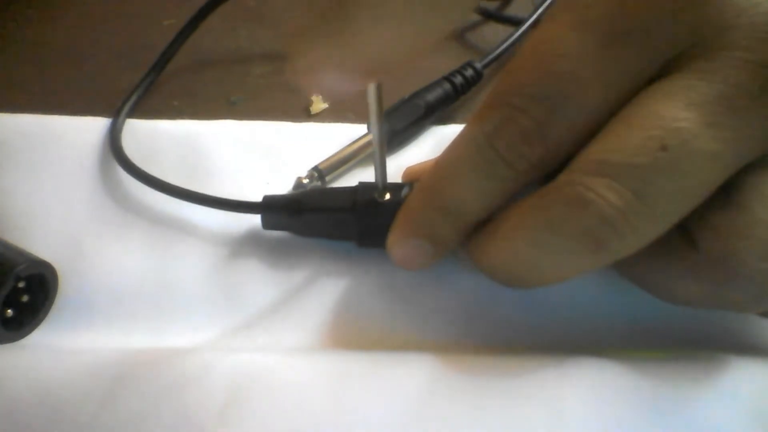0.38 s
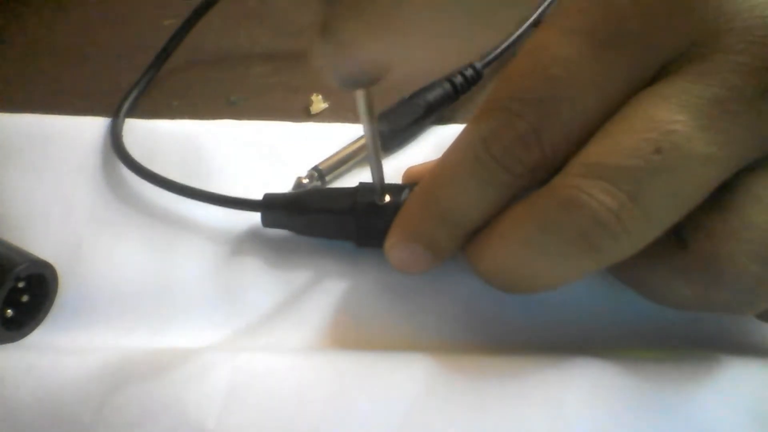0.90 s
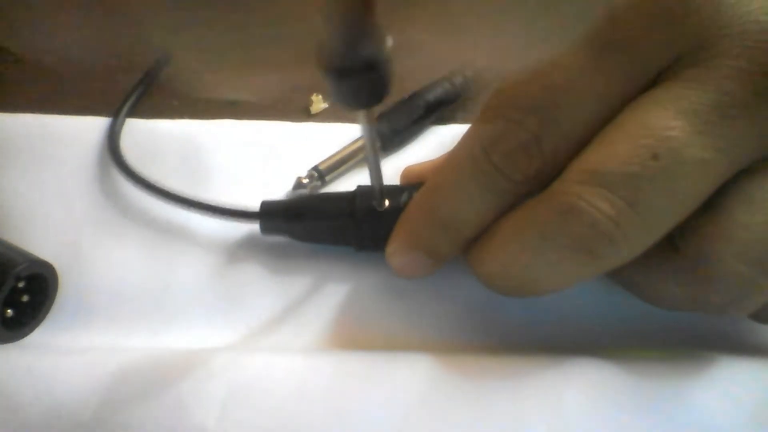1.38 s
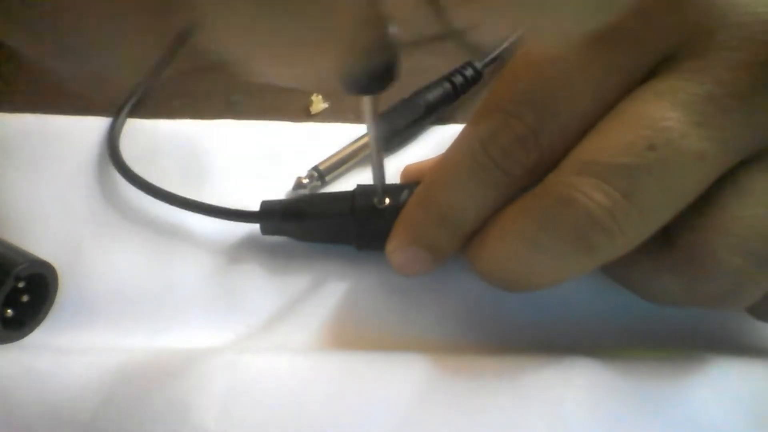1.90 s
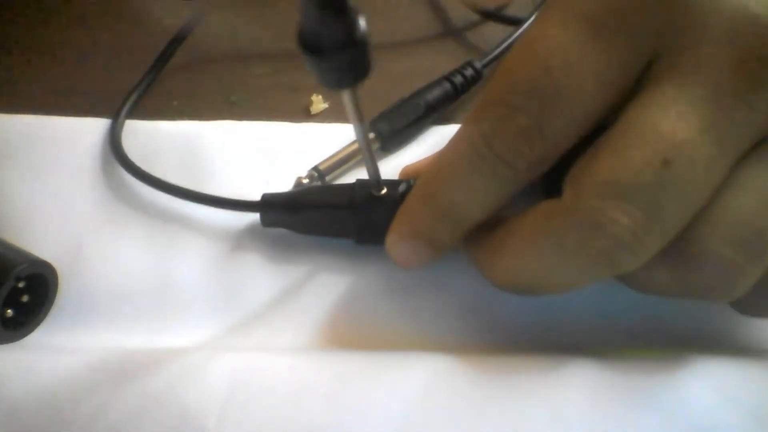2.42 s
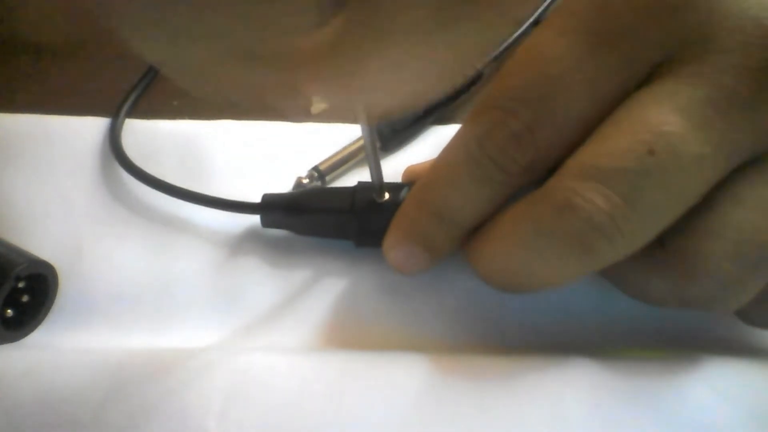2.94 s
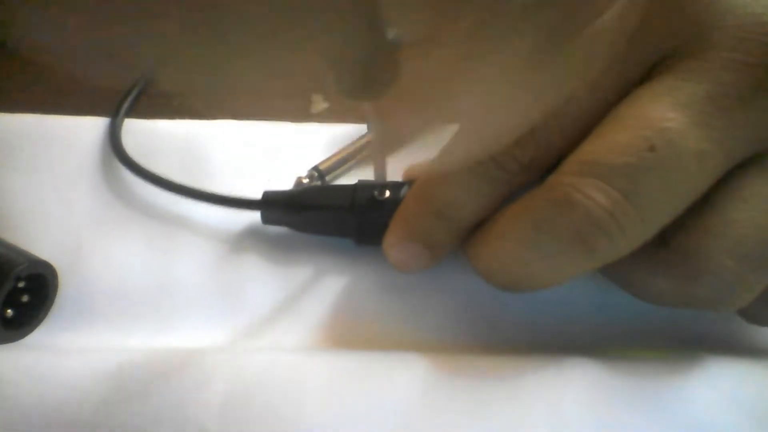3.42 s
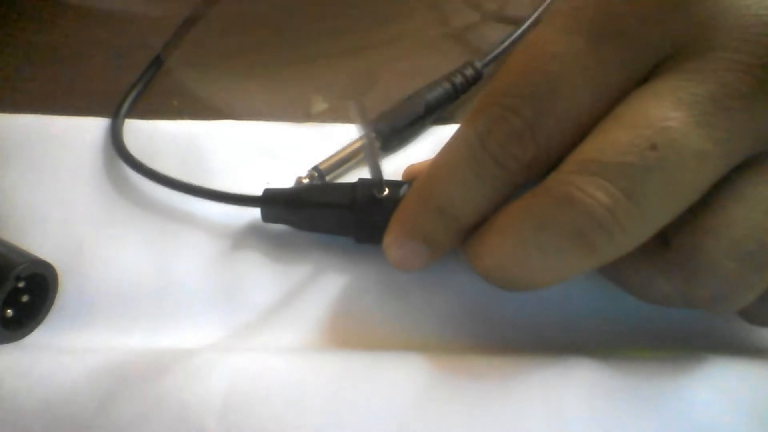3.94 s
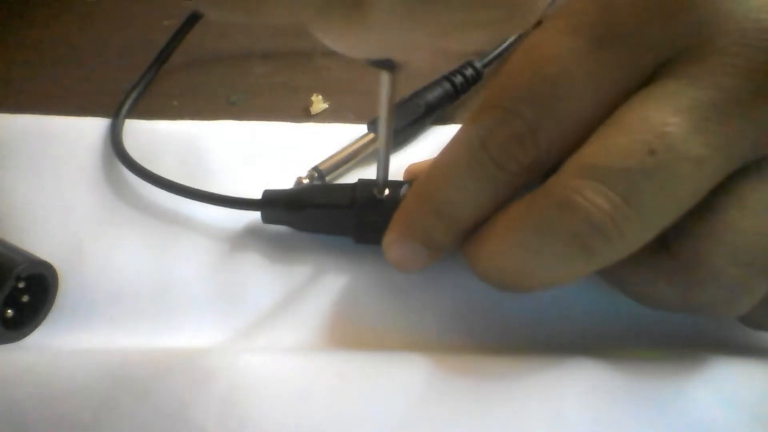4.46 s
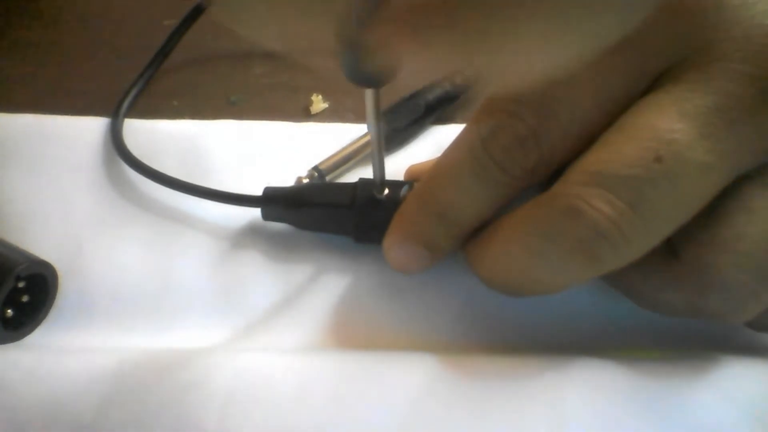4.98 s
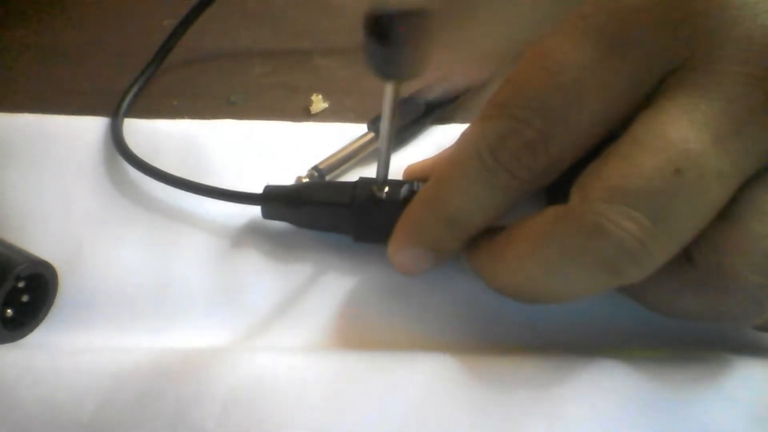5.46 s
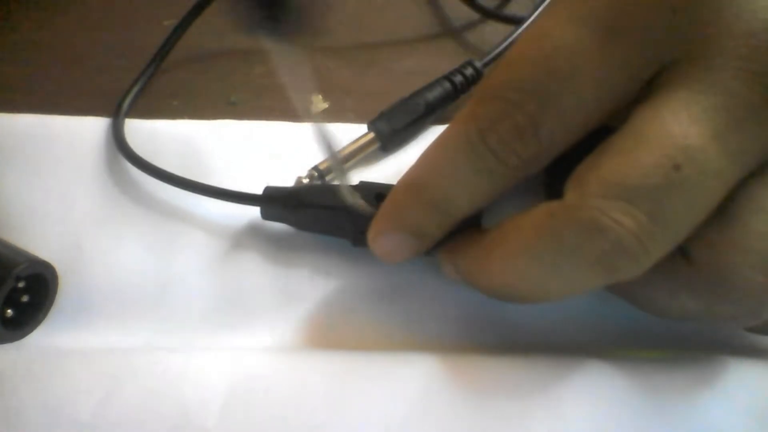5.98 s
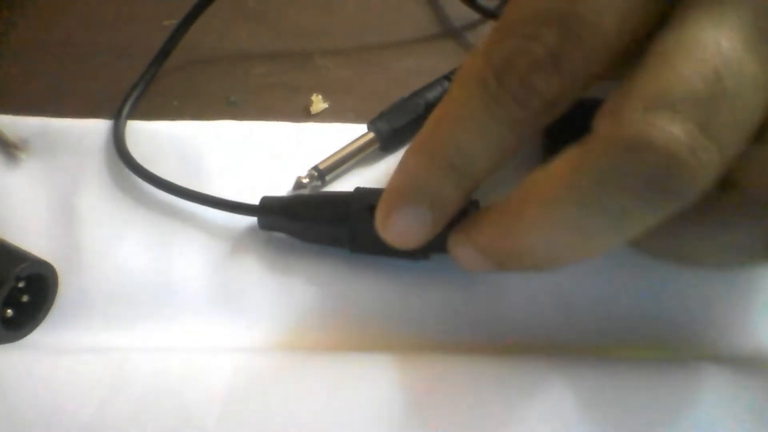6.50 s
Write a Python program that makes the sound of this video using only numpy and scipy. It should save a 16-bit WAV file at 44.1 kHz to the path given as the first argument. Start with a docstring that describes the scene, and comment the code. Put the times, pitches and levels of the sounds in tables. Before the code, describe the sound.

A close, slightly boxy camera microphone hears a small screwdriver working the screw of a cable plug on a desk in a small room, over constant soft fan rumble and faint hiss. At 0.1 s a loud, hard knock cracks and rattles, with a short woody ring; a weaker one follows at 0.2. Very faint taps and a barely audible scrape fill 0.4 to 1.8. A second loud, rattling knock hits at 1.9 with a quick smaller follow-up. After faint rumbling touches around 2.6, a medium knock comes at 2.9, a soft one at 3.3 and another loud crack at 3.6. From 4.3 to 5.5 small ticks and muffled bumps cluster irregularly, strongest near 5.4. From 5.75 to 6.4 the freed steel shaft gives tiny, bright, quickly dying tinkles, clearest at 6.1. At about 6.55 the handle is laid down with a loud, dull plastic-on-wood clack.

```python
"""On a desk, close to a camera microphone, a small screwdriver turns the screw of a cable plug held down by hand.
Slips of the blade tick as cracks of noise and knock the plug against the desk top, which rings as decaying modes.
At the end the freed steel shaft tinkles in its bending modes and the handle is laid down with a dull clack.
Narrow-band noise adds a light tap, a faint scrape, low rumbles and the desk's ringing after knocks;
echoes of a small room, fan rumble and hiss lie around it, and the camera turns its gain down after loud knocks."""
import sys
import numpy as np
from scipy import signal
from scipy.fft import rfft, irfft
from scipy.io import wavfile
from scipy.ndimage import uniform_filter1d

SR = 44100
rng = np.random.default_rng(int(sys.argv[2]) if len(sys.argv) > 2 else 0)


def linear_from_db(decibels):
    """Turn decibels (scalar or array-like) into linear amplitude factors; 0 gives 1."""
    return 10 ** (np.asarray(decibels, float) / 20)


def inscribe(sig):
    """Save sig as 16-bit PCM at rate SR to the path in sys.argv[1].

    A 1-D sig is mono; a 2-D sig holds one channel per row.
    Samples are clipped to [-1, 1] before scaling.
    """
    pcm = np.round(np.clip(np.atleast_2d(sig).T, -1, 1) * 32767)
    wavfile.write(sys.argv[1], SR, pcm.astype(np.int16))


N = 292030  # length in samples

# the plug knocks on the desk: t/s, knock level/dB, rattle level/dB re knock, pitch f/Hz
PLUG_KNOCKS = [(0.077, -2, -10.5, 529), (0.203, -24.5, -14, 405), (0.62, -41, -23, 395),
               (0.705, -24.5, -18.5, 444), (1.114, -24.5, -7, 548), (1.559, -29.5, -10.5, 537),
               (1.767, -34, -21, 567), (1.871, -4.5, -6, 567), (1.924, -17.5, -7.5, 535),
               (2.552, -38, -24, 407), (2.62, -33, -10, 358), (2.869, -10, -9.5, 545),
               (3.001, -32.5, -20, 545), (3.296, -22, -8.5, 530), (3.594, -5.5, -5, 567),
               (4.305, -23.5, -3, 584), (4.578, -33.5, -15, 577), (4.615, -34, -32, 543),
               (4.735, -34.5, -13, 523), (4.868, -37, -12, 548), (4.895, -33, -18, 540),
               (4.945, -22.5, -13, 556), (4.967, -25.5, -14.5, 376), (5.237, -32.5, -13, 394),
               (5.27, -21.5, -13, 385), (5.409, -16, -15, 416), (5.462, -25.5, -14, 520)]
# low modes of plug and desk top: f/Hz, relative level/dB, t60/s
THUD_MODES = [(134.7, -19, 0.31), (203, -1, 0.017), (233, 3, 0.093), (292, -12, 0.1), (356.6, -1.5, 0.084)]
# pitched modes of the plug: multiple of the pitch, relative level/dB, t60/s
PLUG_MODES = [(0.702, -6.5, 0.18), (1.0, 7, 0.046), (1.3, -8.5, 0.086)]
# rattling upper modes of plug and desk top: f/Hz, relative level/dB, t60/s
RATTLE_MODES = [(663, -10, 0.39), (894, 15, 0.12), (1002, 23, 0.072), (1126, 24.5, 0.048),
                (1233, -9, 0.013), (1447, 28, 0.02), (1780, -24, 0.05), (1940, -20, 0.02)]
# steel touches steel: t/s, middle level/dB, low part level/dB re middle, top part level/dB re middle
STEEL_TICKS = [(0.077, -8, -6, -3.5), (0.203, -40, 0, -3), (0.702, -42, -1, -5), (0.747, -54, 14.5, -5),
               (1.558, -39.5, -2, -10), (1.8718, -11.5, -5, -1), (1.9212, -24, 1, -11),
               (2.6197, -40, 3.5, -12), (2.6466, -44, 1, 0), (2.8683, -25.5, 2, -5), (3.2951, -34, 5, -6),
               (3.5936, -9.5, -2, -11.5), (4.42, -40, -3, -15), (4.446, -43, -5, 0), (4.578, -44, 0, -8),
               (4.7333, -40.5, 4.5, -3), (4.8658, -45, 6, -13), (4.9442, -39, 4.5, -4),
               (4.9627, -39, -2, 6), (5.171, -44.5, 3, -2), (5.234, -45, 1, 1), (5.2693, -43, -8, -15),
               (5.4087, -27.5, 9, 2.5), (5.459, -40, -2, 2.5), (5.489, -45, -10, 0), (5.749, -38, -5, 0),
               (5.7588, -33, -22, -5), (5.763, -32, -22, -9), (5.787, -38, -4, -8),
               (5.8749, -32.5, -8, 2.5), (6.0813, -22.5, -10, -2.5), (6.115, -38, -15, -1),
               (6.168, -42, -6, -1), (6.1954, -35, -9, 1), (6.211, -41, -10, -1), (6.3515, -39, -15, -4),
               (6.3637, -38, -17, -2), (6.3994, -34, -19, -10)]
# bending modes of the steel shaft in three parts: f/Hz, relative level/dB, t60/s
SHAFT_LOW_MODES = [(3300, 8, 0.029), (4300, -11, 0.023)]
SHAFT_MID_MODES = [(6300, 7, .015), (6290, 10, 0.019), (6900, -13, 0.014)]
SHAFT_TOP_MODES = [(8200, 3, 0.018), (9560, 4, 0.019), (9640, 3, 0.023)]
# the handle is laid on the desk: t/s, level/dB
HANDLE_LAID = [(6.564, -4.5)]
# modes of the laid handle: f/Hz, relative level/dB, t60/s
HANDLE_MODES = [(222, -19.5, 0.62), (403, -11, 0.098), (540, 5, 0.02), (694, -18, 0.15), (1000, -13, 0.037),
                (1274, -2.5, .06), (1396, 7, 0.034), (1497, -6, 0.041), (1718, 8, 0.032), (1917, -3, 0.046),
                (2160, -11, 0.029), (2500, -16, 0.042), (3120, -19, 0.038), (4280, -23.5, 0.023)]
# a light tap, a faint scrape, low rumbles and the desk's narrow ringing after knocks:
# t/s, length/s, centre f/Hz, width/Hz, rms level/dB ahead of the swell
FAINT_DESK_SOUNDS = [(0.46, 0.009, 1750, 400, -39), (0.462, .024, 1250, 80, -48),
                     (.78, 0.36, 1690, 280, -52), (.1, 0.17, 133, 20, -37.5), (0.121, .09, 480, 97, -34.5),
                     (2.53, 0.21, 200, 170, -49), (2.579, 0.088, 363, 100, -48), (2.6, .2, 135, 20, -49),
                     (4.56, .2, 520, 200, -50), (4.866, 0.083, 450, 290, -47)]
# colour of the echoes: f/Hz, relative level/dB
ROOM_COLOUR = [(100, -15), (250, 0), (500, -2), (1000, -12.5), (2000, -9), (5000, -1.5), (10000, -10)]
# spectrum of rumble and hiss: f/Hz, relative level/dB per Hz
FLOOR_COLOUR = [(35, -85), (60, -49), (102, -22), (154, 1.5), (267, 1.5), (291, -8), (387, -2.5), (442, -8),
                (538, -6), (781, -7.5), (1480, -13.5), (1720, -13.5), (2550, -18.5), (3250, -19),
                (3800, -24), (9110, -26.5), (11400, -36), (14800, -56), (22000, -120)]
# fan resonances: f/Hz, width/Hz, rms level/dB ahead of the waver
FAN_RESONANCES = [(205.7, 15, -56.5), (271.6, 5.2, -58.5), (536.6, 21, -56), (1252, 21, -63)]


def knocks():
    """The plug rings freely off the desk, then lands under the fingers and is damped; the desk thuds and rattles.
    The thud grows more slowly than the knock and is fuller under low, flat landings."""
    landing_s, landing_slope_s, damping_db = 0.0085, 0.00015, -11.0
    full_thud_db, thud_db_per_knock_db, thud_db_per_octave = -14, 0.65, -12.5
    out = np.zeros(N)
    t = np.arange(SR // 4) / SR
    landed = 1 / (1 + np.exp(-np.minimum((t - landing_s) / landing_slope_s, 30)))
    finger_damping = linear_from_db(damping_db * landed)
    for s, knock_db, rattle_re_knock_db, pitch_hz in PLUG_KNOCKS:
        rattle_db = knock_db + rattle_re_knock_db
        thud_db = full_thud_db + thud_db_per_knock_db * knock_db + thud_db_per_octave * np.log2(pitch_hz / 500)

        pitched_modes = np.array(PLUG_MODES) * [pitch_hz, 1, 1]
        plug = finger_damping * ring(pitched_modes, scatter_db=0.5, detune=0.018, contact_s=0.0024)
        rattle = ring(RATTLE_MODES, scatter_db=3.3, detune=0.019, contact_s=0.00095)
        crack = burst(514.0, 2085.0, t60=0.028, tail_db=-15.5, tail_t60=0.21)
        desk_buzz = buzz(660.0, 1140.0, t60=0.28)
        thud = ring(THUD_MODES, scatter_db=2.5, detune=0.025, contact_s=0.0025)

        add(out, s, linear_from_db(knock_db) * plug)
        add(out, s, linear_from_db(rattle_db) * rattle)
        add(out, s, linear_from_db(rattle_db + 4.0) * crack)
        add(out, s, linear_from_db(rattle_db - 3.0) * desk_buzz)
        add(out, s, linear_from_db(thud_db) * thud)
    return out


def tinkles():
    """A shaft held in the slot only cracks; a free one also rings its bending modes."""
    lifted_s = 5.7  # the blade is out of the slot after this
    out = np.zeros(N)
    for s, middle_db, low_db, top_db in STEEL_TICKS:
        ringing_share = 0.5 if s > lifted_s else 0
        parts = ((SHAFT_LOW_MODES, 2450.0, 3650.0, low_db),
                 (SHAFT_MID_MODES, 4400.0, 7300.0, 0),
                 (SHAFT_TOP_MODES, 7500.0, 10600.0, top_db))
        for modes, lo_hz, hi_hz, part_db in parts:
            gain = linear_from_db(middle_db + part_db)
            tinkle = ring(modes, scatter_db=2, detune=0.02, contact_s=0.0004)
            crack = burst(lo_hz, hi_hz, t60=0.0032, tail_db=-8, tail_t60=0.028)
            add(out, s, gain * ringing_share * tinkle)
            add(out, s, gain * (1 - ringing_share) * crack)
    return out


def handle():
    """One dull clack of plastic on wood: the handle's modes over a weaker desk buzz."""
    out = np.zeros(N)
    for s, db in HANDLE_LAID:
        add(out, s, linear_from_db(db) * ring(HANDLE_MODES, scatter_db=4.5, detune=0.0033, contact_s=0.0012))
        add(out, s, linear_from_db(db - 11.5) * buzz(460.0, 1700.0, t60=0.21))
    return out


def ring(modes, scatter_db, detune, contact_s):
    """One blow on a set of modes, peak 1; every blow lands a little differently, a longer contact is duller."""
    hz, db, t60 = np.transpose(modes)[:, :, None]
    t = np.arange(SR // 4) / SR
    level_chance, pitch_chance = rng.standard_normal((len(modes), 2)).T[:, :, None]
    decay = linear_from_db(db + scatter_db * level_chance - 60 * t / t60)
    onset = np.minimum(t / contact_s, 1)
    tones = np.sin(2 * np.pi * hz * (1 + detune * pitch_chance) * t)
    y = np.sum(decay * onset * tones, axis=0)
    return y / np.max(np.abs(y))


def burst(lo_hz, hi_hz, t60, tail_db, tail_t60):
    """A click and a dry crack of noise with a weak rattling tail, peak 1."""
    t = np.arange(SR // 8) / SR
    envelope = linear_from_db(-60 * t / t60) + linear_from_db(tail_db - 60 * t / tail_t60)
    y = rng.standard_normal(len(t)) * envelope
    y[0] += 4.0  # the click
    return band_peak_1(y, lo_hz, hi_hz)


def buzz(lo_hz, hi_hz, t60):
    """Dense desk-top resonances, as noise that swells, carries on and then drops away at once, peak 1."""
    swell_s, drop_s, drop_db = 0.0009, 0.037, -7.0
    t = np.arange(SR // 6) / SR
    swell = np.minimum(t / swell_s, 1)
    decay = linear_from_db(-60 * t / t60 + drop_db * (t > drop_s))
    return band_peak_1(rng.standard_normal(len(t)) * swell * decay, lo_hz, hi_hz)


def band_peak_1(x, lo_hz, hi_hz):
    """Keeps one band of a sound and sets its peak to 1."""
    y = signal.sosfilt(signal.butter(3, [lo_hz, hi_hz], "band", fs=SR, output="sos"), x)
    return y / np.max(np.abs(y))


def add(out, s, y):
    """Mixes y into out from time s."""
    i = int(s * SR)
    y = y[:N - i]
    out[i:i + len(y)] += y


def faint_desk_sounds():
    """Narrow-band noise that rises quickly and trails off: a tap, a scrape, rumbles and desk ringing."""
    out = np.zeros(N)
    for s, length_s, hz, width_hz, db in FAINT_DESK_SOUNDS:
        narrow_noise = signal.lfilter(*signal.iirpeak(hz, hz / width_hz, SR), rng.standard_normal(SR // 2))
        progress = np.linspace(0, 1, int(length_s * SR))
        swell = np.sin(np.pi * np.sqrt(progress))  # fullest a quarter of the way in
        add(out, s, level(narrow_noise, db)[-len(progress):] * swell)
    return out


def room(x):
    """Dense echoes of a small room, setting in after the nearest surfaces answer; the treble dies first."""
    split_hz, low_t60, high_t60, onset_s, echo_db = 2000, 0.25, 0.21, 0.0076, -35.5
    t = np.arange(SR // 2) / SR
    low = signal.sosfilt(signal.butter(1, split_hz, fs=SR, output="sos"), rng.standard_normal(len(t)))
    high = signal.sosfilt(signal.butter(1, split_hz, "high", fs=SR, output="sos"), rng.standard_normal(len(t)))
    decaying = low * linear_from_db(-60 * t / low_t60) + high * linear_from_db(-60 * t / high_t60)
    echoes = decaying * (1 - np.exp(-t / onset_s))
    return signal.fftconvolve(x, linear_from_db(echo_db) * colour(echoes, ROOM_COLOUR))[:N]


def floor():
    """Steady broad rumble and hiss as coloured noise, with a few fan resonances that waver very slightly."""
    out = level(colour(rng.standard_normal(N), FLOOR_COLOUR), -45.5)
    for hz, width_hz, db in FAN_RESONANCES:
        hum = signal.lfilter(*signal.iirpeak(hz, hz / width_hz, SR), rng.standard_normal(N))
        waver = linear_from_db(0.81 * walk(3.8))
        out = out + level(hum, db) * waver
    return out


def colour(x, points):
    """Weights a spectrum by (f/Hz, level/dB) points, joined along log frequency."""
    hz, db = np.transpose(points)
    f = np.maximum(np.arange(len(x) // 2 + 1) * SR / len(x), 1)
    return irfft(rfft(x) * linear_from_db(np.interp(np.log(f), np.log(hz), db)), len(x))


def level(x, db):
    """Sets the rms level."""
    return x * linear_from_db(db) / np.sqrt(np.mean(x ** 2))


def walk(rate):
    """Random values held for 1 / rate seconds, then smoothed twice into a slow drift."""
    hold = int(SR / rate)
    steps = np.repeat(rng.standard_normal(N // hold + 1), hold)
    return 0.27 * uniform_filter1d(uniform_filter1d(steps, hold), hold)[:N]


def scene():
    """Tool and desk sounds and their echoes in the room, over the floor."""
    work = knocks() + tinkles() + handle() + faint_desk_sounds()
    return (work + room(work) + floor())[None]


def low_pass(x):
    """Removes everything above the highest recorded frequency."""
    return signal.sosfilt(signal.butter(12, 13500, fs=SR, output="sos"), x)


def record(dry):
    """The camera cuts lows and highs; its gain control reacts late and lets go slowly; peaks clip."""
    threshold, lag_s, release_s, deepest_duck_db = 0.15, 0.035, 0.35, -5.0
    x = signal.sosfilt(signal.cheby2(6, 38, 90, "high", fs=SR, output="sos"), dry)
    lag = int(lag_s * SR)
    keep = np.exp(-1 / (release_s * SR))
    excess = np.maximum(np.abs(x) - threshold, 0) ** 2
    loudness = signal.lfilter([1 - keep], [1, -keep], excess)
    late_loudness = np.pad(loudness, ((0, 0), (lag, 0)))[:, :N]
    duck_db = deepest_duck_db * np.tanh(late_loudness / 0.0048)
    x = signal.sosfilt(signal.butter(6, 11300, fs=SR, output="sos"), x * linear_from_db(duck_db))
    mix = np.clip(x, -0.98, 0.98)
    return low_pass(mix)


dry = scene()
out = record(dry)
inscribe(out)
```